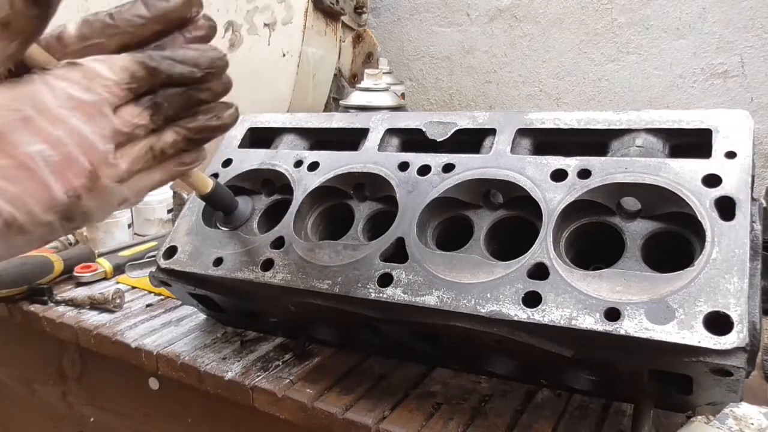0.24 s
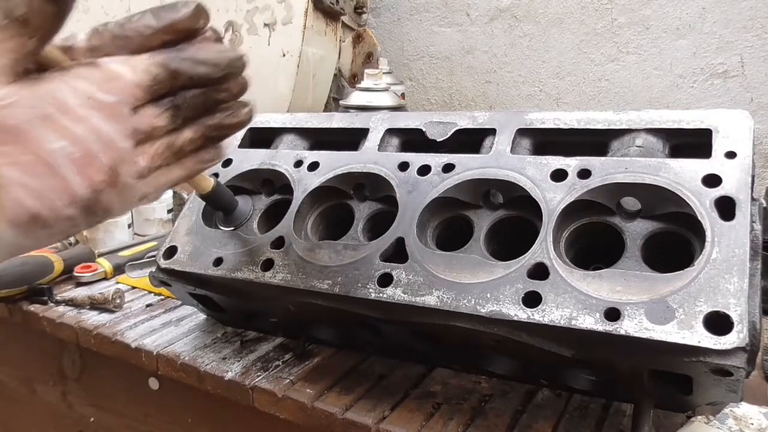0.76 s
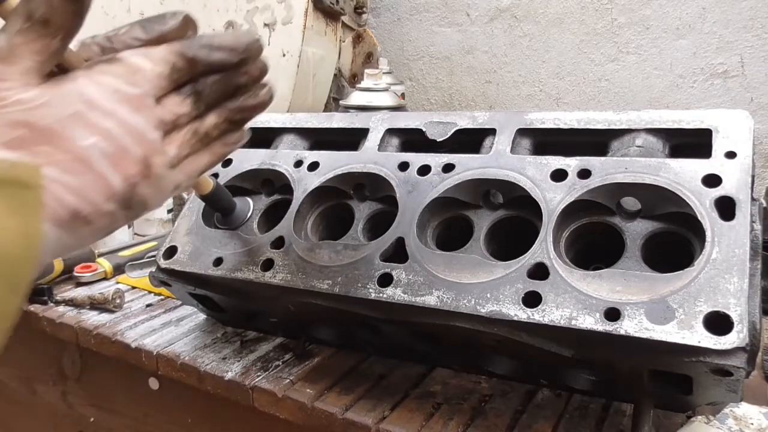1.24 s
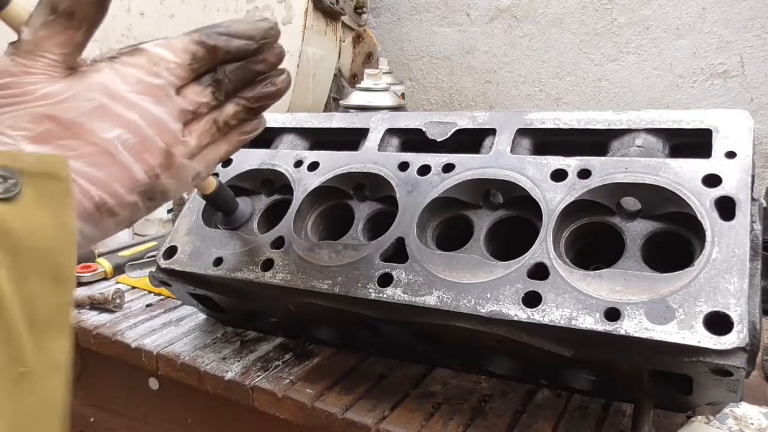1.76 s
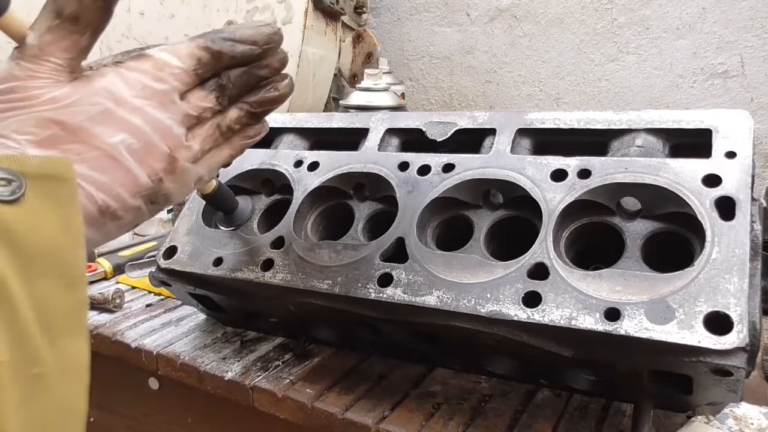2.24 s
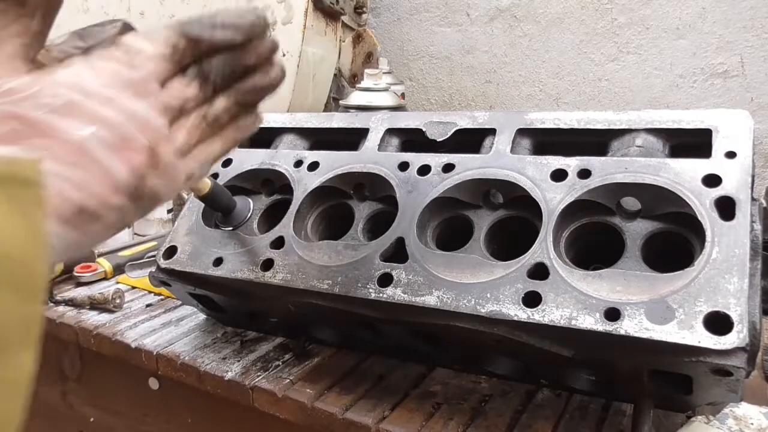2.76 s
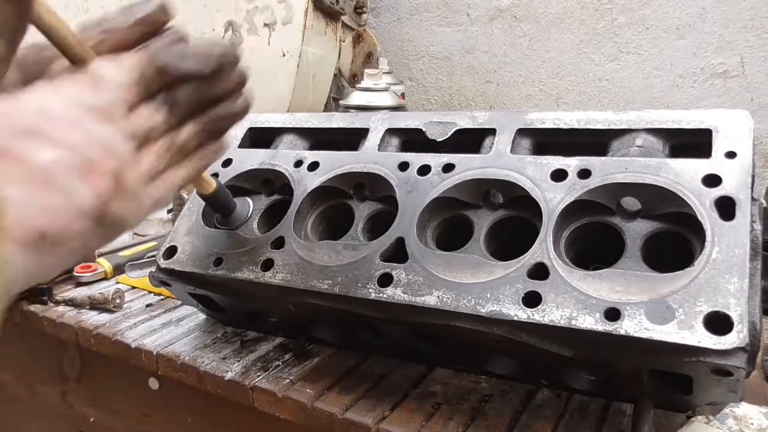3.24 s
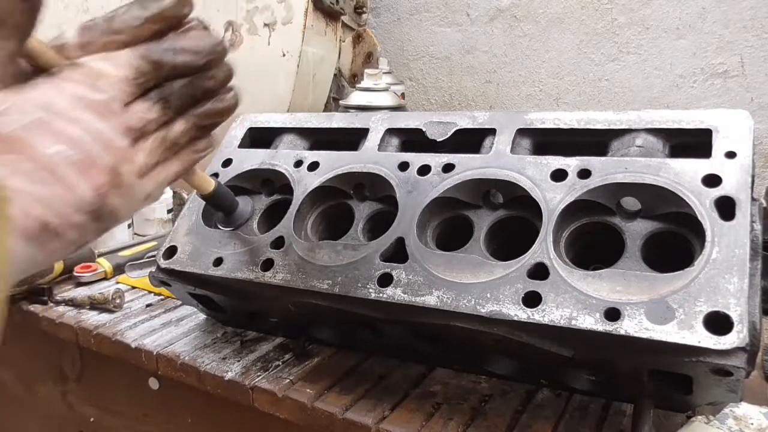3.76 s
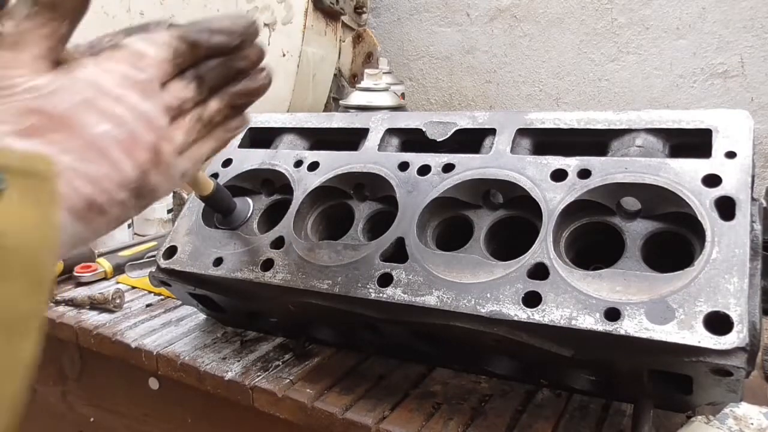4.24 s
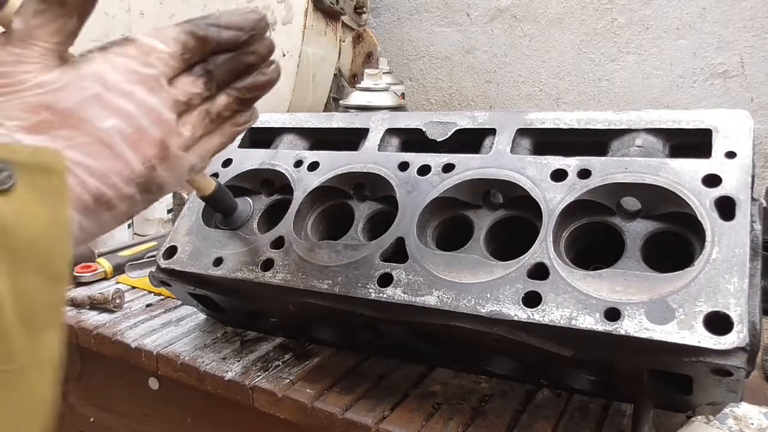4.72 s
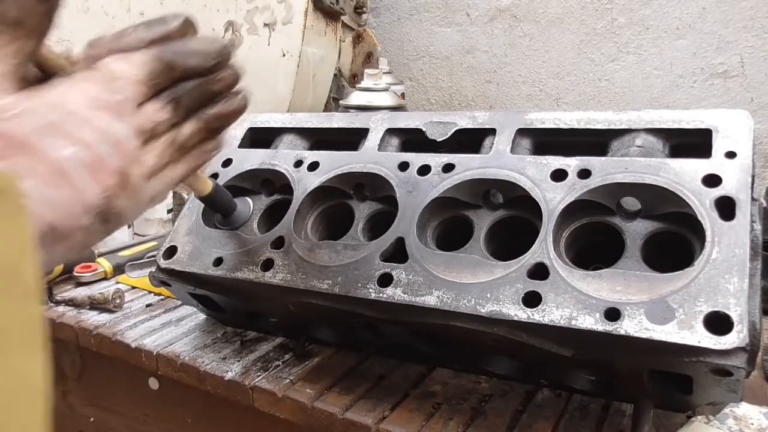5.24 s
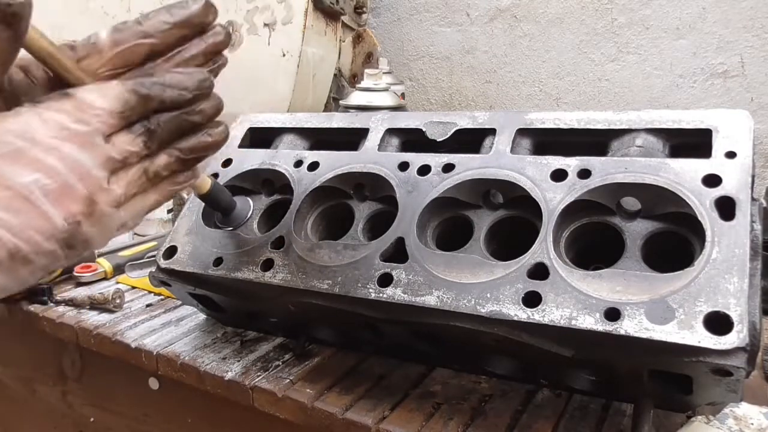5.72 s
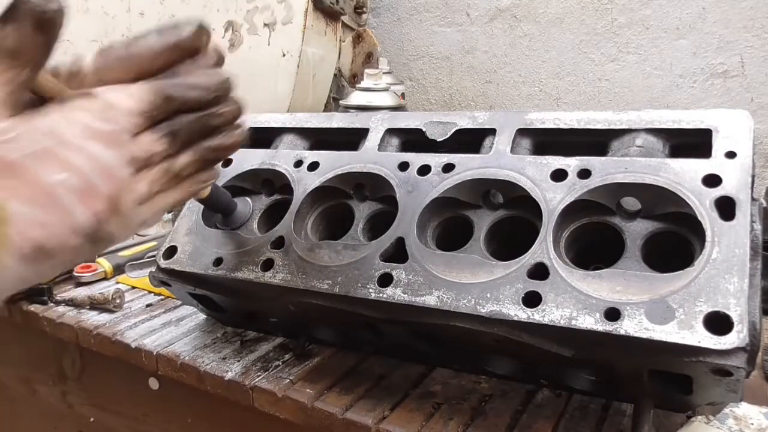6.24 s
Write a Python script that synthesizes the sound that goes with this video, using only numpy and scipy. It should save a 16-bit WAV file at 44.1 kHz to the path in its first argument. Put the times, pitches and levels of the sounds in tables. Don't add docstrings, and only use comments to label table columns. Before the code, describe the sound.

Rapid scrape-scrape of grinding paste in a heavy iron casting, heard close with little room tail. Strokes swell and stop, some chattering with a hollow, honking note. The rhythm breaks twice as hands let go and rustle over the stick, then resumes evenly. Distant engines drift beneath, a lorry strongest around 5.6 seconds, and a final stroke lifts to a higher, breathy note.

```python
import sys
import numpy as np
from scipy import signal
from scipy.fft import rfft, irfft
from scipy.io import wavfile

SR = 44100
rng = np.random.default_rng(int(sys.argv[2]) if len(sys.argv) > 2 else 0)


def gain_from_db(level_db):
    decades = np.asarray(level_db, float) / 20
    return 10 ** decades


def log_audio(samples):
    frames = np.atleast_2d(samples).T
    limited = np.clip(frames, -1, 1)
    pcm = np.round(limited * 32767).astype(np.int16)
    wavfile.write(sys.argv[1], SR, pcm)


N = 285768
TIME = np.arange(N) / SR
HZ = np.maximum(np.fft.rfftfreq(N, 1 / SR), 1)

# (time [s], rumble level [dB])
TRAFFIC_SWELL = [
    (0.0, -56),
    (0.54, -57.5),
    (1.51, -55.5),
    (1.93, -55),
    (3.1, -53),
    (4.13, -52.5),
    (4.48, -53.5),
    (5.31, -52.5),
    (5.56, -48),
    (5.77, -47.5),
    (6.01, -48),
    (6.32, -51),
    (6.48, -51.5),
]
# (nearest time [s], time near [s], pitch [Hz], glide [Hz/s], level [dB])
LORRY = [
    (4.25, 0.39, 47.8, 2.5, -56.5),
    (5.62, 0.14, 51.8, 3.4, -46),
    (5.33, .2, 104.5, 3.9, -44.5),
    (5.22, 0.1, 213, 1.1, -60),
    (5.85, 0.085, 214.2, 3.0, -45),
]
CAR = [
    (2.05, 0.17, 64.2, 11.5, -53),
    (2.65, .2, 72, 10.5, -57),
    (3.3, 0.15, 70.6, -11, -58),
    (3.7, .18, 61.96, -20.0, -57),
]
VAN = [
    (4.78, 0.21, 250.2, -2.5, -53),
]
BUS = [
    (5.2, .12, 126.9, -6, -55),
    (5.9, 0.26, 124, -0.5, -52),
]
IDLER = [
    (.45, .2, 114.5, -3.5, -62.5),
    (.9, 0.11, 107, 3.5, -59),
    (1.45, 0.33, 116.2, 10, -60.5),
]
MOPED = [
    (4.63, 0.2, 180, 0.082, -57.5),
]
# (frequency [Hz], level [dB per Hz])
RUMBLE_COLOUR = [(25, -27), (45, -3), (70, -5), (90, -10.5), (120, -5), (230, 0.5), (350, -6), (600, -8),
                 (800, -11), (1100, -13), (1650, -26), (3000, -45.5)]
AIR_COLOUR = [(1000, 1), (2000, 2), (4000, 2), (6200, -1), (8500, 2.5), (11000, 1), (14000, -6),
              (16000, -11)]

# (start [s], grit level [dB], pointedness of the speed peak [-], port level [dB])
TWISTS = [(-0.115, -48, 1.6, -35.5), (0.086, -48.5, 1.25, -38), (0.29, -48, 1.22, -41),
          (0.504, -48, 1.4, -38), (0.737, -47, 0.75, -38.5), (0.927, -45, 1.34, -38),
          (1.152, -47.5, 0.62, -37.5), (1.352, -45.5, 1.27, -39.5), (1.56, -46, 0.78, -38),
          (1.782, -45, 1.8, -37), (2.024, -45.5, 0.95, -38.5), (2.287, -44.5, 1.07, -38),
          (2.805, -44, 2, -32.5), (3.387, -44, 1.95, -42), (3.705, -45, 1.93, -39.5),
          (3.927, -44, 2.06, -37.5), (4.138, -45, 0.93, -40), (4.346, -45, 1.54, -40),
          (4.565, -43.5, 1.43, -39), (4.778, -43, 1.7, -37.5), (4.979, -44, 1.7, -40.5),
          (5.177, -43.5, 1.87, -36.5), (5.377, -44, 1.64, -36), (5.573, -44, 1.85, -39),
          (5.78, -44.5, 1.46, -39.5), (5.997, -44, 1.6, -40), (6.22, -43.5, 1.33, -38.5),
          (6.413, -40.5, 3, -44.5)]
LET_GO = [
    2.512,
    3.23,
    6.603,
]
# (start [s], end [s], lean [-], grit level [dB], pointedness [-])
COAST = (2.494, 2.568, 1.5, -52.0, 0.88)
REVERSAL_GAP = [.007, 0, -.012]
# (time [s], level [dB])
BEARING = [(0, -0.2), (2.47, 0.35), (2.51, -10), (2.57, -19), (2.6, -32), (2.83, -34), (2.9, -11),
           (2.96, -1.8), (3.13, -4), (3.24, -31), (3.4, -28), (3.47, -12), (3.5, 4.5), (3.6, 1.9),
           (6.22, -0.35), (6.3, -10), (6.41, -22), (6.45, -1)]

# (frequency [Hz], width [Hz], level [dB], left-right [dB])
VALVE_HEAD_MODES = [(6910, 55, -11, 0), (8070, 45, -6, -1.5), (8812, 55, -3, -0.5), (9200, 60, -8, 0),
                    (9471, 50, 0, -2.5), (9720, 50, -8, 0), (9950, 60, -5, 0), (11800, 80, -12, -3.0),
                    (12800, 110, -13, -4.0)]
# (frequency [Hz], width [Hz], level [dB], left-right [dB])
CASTING_MODES = [(1756, 7, 1.5, -12), (1840, 18, 3, 3.5), (1945, 22, -6, -5), (3711, 38, -1, 8),
                 (3935, 28, -5.5, -9), (4970, 18, -9, 2.0)]
# (frequency [Hz], width [Hz], level [dB], left-right [dB])
CLEAR_MODES = [(2308, 16, -11, 1.5), (3546, 28, -9.5, 2.0), (5197, 24, -15.5, 3.0)]
# (forward twist [dB], backward twist [dB])
BITE = [(4.5, -3), (2.5, -2), (2, 0.5)]
# (time [s], extra level [dB])
ODD_BITES = [
    [(0.02, -10), (2.41, 0), (3.55, 5), (3.82, -10), (4.03, -3), (4.68, -3), (5.48, -3.5), (6.1, 7),
     (6.32, -4.5), (6.46, 5)],
    [(0.4, -0.5), (0.62, -27), (1.9, 6), (2.16, -4), (2.41, -0.5), (3.82, -3), (4.24, 1.5), (4.45, 6.5),
     (4.68, 2.5), (4.87, 1), (5.08, -4), (5.48, -4)],
    [(0.02, 0), (0.62, 0), (1.25, -2), (1.9, 3), (3.01, -10), (3.82, -7), (5.28, 0), (5.89, 0)],
]
# (frequency [Hz], width [Hz], level [dB], left-right [dB])
PORT_MODES = [(873.5, 37.5, -9.5, 2), (913, 19.5, -6, -5), (962.6, 40.3, -1, 3), (1000, 31.4, -4.5, 3),
              (1037, 43, -15, -4), (1117, 40, -12, -1), (1152, 48, -14.5, -5.5), (1329, 40, -19, 2),
              (1480, 39, -20.5, 5)]
# (time [s], peak level [dB], pitch [Hz])
CATCHES = [(0.033, -28.5, 926), (0.139, -22, 966), (0.192, -24.5, 966), (0.226, -24.5, 921),
           (0.537, -34, 1006), (0.772, -24.5, 929), (0.977, -27, 963), (1.032, -24, 1007),
           (1.497, -27.5, 1000), (1.576, -26, 1000), (2.039, -27.5, 972), (2.318, -24.5, 967),
           (2.385, -23, 928), (2.463, -23.5, 972), (3.042, -24.5, 947), (3.101, -34, 970),
           (3.499, -19, 970), (3.631, -26, 1028), (3.734, -26.5, 987), (3.814, -23, 920), (4.038, -26, 966),
           (4.146, -22.5, 943), (4.314, -22, 963), (4.641, -26, 963), (4.874, -20.5, 980),
           (5.219, -24, 959), (5.437, -26, 968), (5.612, -21, 951), (5.701, -23, 983), (6.469, -22.5, 932)]
# (time [s], length [s], level [dB])
SLIPS = [
    (1.829, 0.0092, -44),
    (2.789, 0.017, -51),
    (2.828, 0.012, -54),
    (3.297, 0.024, -51),
    (3.334, 0.057, -56.5),
    (3.393, 0.023, -52.5),
]
# (time [s], pitch [Hz], level [dB])
LIFT = [
    (6.27, 1013, -53),
    (6.329, 1080, -46.5),
    (6.41, 1153, -46),
]
# (frequency [Hz], level [dB per Hz])
GRIT_COLOUR = [(4500, -18), (6000, -16), (7500, -8), (8700, -4), (9600, -2), (10600, -6), (12500, -12),
               (13600, -11), (14300, -14), (15000, -31)]
SCRAPE_COLOUR = [(600, -15), (900, 12), (1400, 7), (1650, -3.5), (2600, -3), (2950, 1.5), (3350, -2.5),
                 (3650, -4.5), (4300, -1.5), (5800, -6.5), (7000, -12), (9000, -37)]
SKIN_COLOUR = [(2000, -26), (4000, -7), (7000, -8), (10000, 5.5), (13000, -11), (15000, -22)]

# (frequency [Hz], likeness [0-1])
NEAR_LIKENESS = [(800, 0.54), (1450, 0.87), (1700, 0.85), (2600, 0.91), (3350, 0.99), (3600, 0.81),
                 (4700, 0.86), (5600, 0.69), (7300, 0.29), (9500, 0.55), (12000, 0.62), (14000, 0.16)]
FAR_LIKENESS = [(60, 0.94), (150, 0.98), (380, 0.85), (950, 0.6), (2380, 0.15), (5980, 0.21), (15000, 0.08)]
# (frequency [Hz], left-right [dB])
PORT_BALANCE = [(60, -2.5), (200, -1.2), (600, -2.0), (1000, 0.5), (1700, 0), (7000, 0), (8000, 1.5),
                (10000, -0.5), (12500, -5.5), (15000, -4.0)]
# (frequency [Hz], left leads by [rad])
PORT_LEAD = [(1000, .15), (1450, .4), (1750, 0), (6500, .05), (7500, 1.5), (8300, .4), (9400, -.4),
             (10300, .3), (12000, .4), (13300, 2.5), (14200, 3.1)]

AIR_DB, PASS_FALL_DB = -66.5, 17.5
ROAR_DB, ROAR_FOLLOWS = -54.0, 0.81
LEAN_FORWARD, LEAN_BACK, LEAN_RESTART = 0.84, 0.99, 1.04
CASTING_DB, CASTING_BACK_DB = -51.0, 0.3
CASTING_FOLLOWS_GRIT, CASTING_FOLLOWS_BEARING = 0.65, 0.42
YARD_T60_S, YARD_DB = 0.35, -14


def rms_one(x):
    return x / np.sqrt(np.mean(x ** 2) + 1e-20)


def in_time(rows):
    s, *columns = np.transpose(rows)
    return [np.interp(TIME, s, c) for c in columns]


def at_hz(points):
    hz, value = np.transpose(points)
    return np.interp(np.log(HZ), np.log(hz), value)


def drift(rate):
    r = np.exp(-80 * np.pi * rate / SR)
    noise = rng.standard_normal(N // 40 + 2002)
    slow = signal.lfilter([1], [1, -2 * r, r * r], noise)[2000:]
    return np.interp(np.arange(N) / 40, np.arange(len(slow)), rms_one(slow))


def colour(x, spectrum):
    gain = gain_from_db(at_hz(spectrum))
    return irfft(rfft(x) * gain / np.sqrt(np.mean(gain ** 2)), N)


def two_ports(shared, own, likeness):
    alike = np.clip(at_hz(likeness), 0, 1)
    mid = np.sqrt((1 + alike) / 2) * rfft(shared)
    side = np.sqrt((1 - alike) / 2) * rfft(own)
    offset = gain_from_db(at_hz(PORT_BALANCE) / 2) * np.exp(0.5j * at_hz(PORT_LEAD))
    return irfft(np.array([(mid + side) * offset, (mid - side) / offset]), N)


def engine(s, near_s, hz, glide, db):
    pitch = hz + glide * np.clip(TIME - s, -1, 1)
    unsteady = pitch * (1 + 0.0079 * drift(4.56))
    note = np.sin(2 * np.pi * np.cumsum(unsteady) / SR)
    pass_db = db - PASS_FALL_DB * np.log10(1 + ((TIME - s) / near_s) ** 2)
    return np.sqrt(2) * gain_from_db(pass_db + 1.56 * drift(4.2)) * note


def traffic():
    rumble_db, = in_time(TRAFFIC_SWELL)
    roar_db = ROAR_DB + ROAR_FOLLOWS * (rumble_db - rumble_db.mean())
    noise = two_ports(*rng.standard_normal((2, N)), FAR_LIKENESS)
    noise = rms_one(colour(noise, RUMBLE_COLOUR))
    low = signal.sosfiltfilt(signal.butter(2, 340, fs=SR, output="sos"), noise)
    rumble = gain_from_db(rumble_db + 3.5) * low + gain_from_db(roar_db + 7.0) * (noise - low)
    notes = sum(engine(*note) for note in LORRY + CAR + VAN + BUS + IDLER + MOPED)
    air = colour(two_ports(*rng.standard_normal((2, N)), FAR_LIKENESS), AIR_COLOUR)
    return rumble + notes * gain_from_db([[-1.2], [1.2]]) + gain_from_db(AIR_DB) * air


def twists():
    turn = np.transpose(TWISTS)[0]
    grip = np.searchsorted(LET_GO, turn)
    half_gap = np.array(REVERSAL_GAP)[grip] / 2
    end = np.minimum(np.append(turn[1:], np.inf) - half_gap, np.array(LET_GO)[grip])
    forward = np.arange(len(turn)) % 2 == 0
    return turn + half_gap, end, forward


def per_twist(values):
    return np.asarray(values)[np.searchsorted(twists()[0], TIME) - 1]


def spin(sharpness, lag_s, with_level):
    coarse = TIME[::32]
    start, end, forward = twists()
    lean = np.where(forward, LEAN_FORWARD, LEAN_BACK)
    lean[np.searchsorted(start, LET_GO[:-1])] = LEAN_RESTART
    rows = np.c_[start, end, lean, np.array(TWISTS)[:, 1:3]]
    start, end, lean, db, pointed = np.vstack([rows, COAST]).T[:, :, None]
    part = np.clip((coarse - lag_s - start) / (end - start), 0, 1)
    speed = np.abs(np.sin(np.pi * part ** lean)) ** (pointed * sharpness)
    each = gain_from_db(db * with_level) * speed * (part < 1)
    return np.interp(TIME, coarse, np.sqrt(np.sum(each ** 2, axis=0)))


def grains(per_s, spread_db):
    sizes = gain_from_db(spread_db * np.minimum(rng.exponential(1, N), 5)) * rng.choice([-1, 1], N)
    return rms_one(sizes * (rng.random(N) < per_s / SR))


def resonate(x, modes, wander_db, wander_rate):
    out, power = np.zeros((2, N)), 0
    for k, (hz, width, db, pan_db) in enumerate(modes):
        r = np.exp(-np.pi * width / SR)
        drive = x * gain_from_db(db + wander_db * drift(wander_rate)) * (-1) ** k
        zeros = [(1 - r * r) / 2, 0, (r * r - 1) / 2]
        poles = [1, -2 * r * np.cos(2 * np.pi * hz / SR), r * r]
        ring = signal.lfilter(zeros, poles, drive + 1e-18)
        out += ring * gain_from_db([[pan_db / 2], [-pan_db / 2]])
        power += gain_from_db(2 * db) * np.pi * width / SR
    return out / np.sqrt(power)


def seat_grit():
    level = spin(0.94, 0, with_level=0.99) * gain_from_db(1.26 * drift(18))
    shared, own = (level * grains(14000, 3.44) for _ in range(2))
    hiss = colour(two_ports(shared, own, NEAR_LIKENESS), GRIT_COLOUR)
    head = resonate(own, VALVE_HEAD_MODES, wander_db=3.5, wander_rate=3.4)
    return gain_from_db(-0.5) * hiss + gain_from_db(-5.5) * head


def bite_into(both_ways, odd):
    start, _, forward = twists()
    db = np.where(forward, *both_ways)
    s, extra_db = np.transpose(odd)
    db[np.searchsorted(start, s) - 1] += extra_db
    return per_twist(db)


def casting(casting_db):
    clumps = gain_from_db(casting_db + 1.83 * drift(17.0))
    shared, own = (clumps * grains(6000, 3.03) for _ in range(2))
    speed = spin(0.73, 0.0012, with_level=0)
    scrape = colour(two_ports(speed * shared, speed * own, NEAR_LIKENESS), SCRAPE_COLOUR)
    drive = spin(0.56, 0.0085, with_level=0) * own
    rings = gain_from_db(-6.0) * resonate(drive, CASTING_MODES, wander_db=2.0, wander_rate=4.6)
    for (hz, width, db, pan_db), bite, odd in zip(CLEAR_MODES, BITE, ODD_BITES):
        bitten = drive * gain_from_db(bite_into(bite, odd))
        rings += gain_from_db(db) * resonate(bitten, [(hz, width, 0, pan_db)], wander_db=2.5, wander_rate=14.5)
    return gain_from_db(2.0) * scrape + rings


def port(port_db):
    level = spin(0.31, 0.0016, with_level=0) * gain_from_db(port_db + 1 + 1.5 * drift(33))
    grind = resonate(level * grains(8000, 3.24), PORT_MODES, wander_db=1.0, wander_rate=3.5)
    grind = signal.sosfilt(signal.butter(3, [790, 1700], "band", fs=SR, output="sos"), grind)
    chatter, after = np.zeros(N + SR), TIME[:SR // 10]
    swell = after / 0.0083 * np.exp(1 - after / 0.0073)
    for (s, db, hz), phase in zip(CATCHES, rng.random(len(CATCHES))):
        at = round(s * SR)
        note = np.sin(2 * np.pi * (hz * after + phase))
        chatter[at:at + SR // 10] += gain_from_db(db - 6.5) * swell * note
    return grind + chatter[:N] * gain_from_db([[0.9], [-0.9]])


def fingers():
    coarse = TIME[::32]
    level = np.zeros(len(coarse))
    for s, length, db in SLIPS:
        fall = np.exp(-np.clip((coarse - s) / length, 0, 9) ** 3)
        level += gain_from_db(db) * (coarse > s) * fall
    shared, own = (np.interp(TIME, coarse, level) * grains(9000, 3.3) for _ in range(2))
    return colour(two_ports(shared, own, NEAR_LIKENESS), SKIN_COLOUR)


def lifted_port():
    hz, db = in_time(LIFT)
    fade = np.clip(np.minimum(TIME - LIFT[0][0], LIFT[-1][0] - TIME) / 0.018, 0, 1)
    return gain_from_db(db) * fade * drift(60) * np.sin(2 * np.pi * np.cumsum(hz) / SR)


def yard(x):
    after = TIME[:SR // 2]
    tail = rng.standard_normal((2, SR // 2)) * gain_from_db(-60 * after / YARD_T60_S) * (after > 0.003)
    tail /= np.sqrt(np.sum(tail ** 2, axis=1, keepdims=True))
    return gain_from_db(YARD_DB) * signal.fftconvolve(x, tail, axes=1)[:, :N]


def scene():
    bearing_db, = in_time(BEARING)
    _, grit_db, _, port_db = np.transpose(TWISTS)
    backward = ~twists()[2]
    scrape_db = CASTING_FOLLOWS_GRIT * (grit_db - grit_db.mean()) + CASTING_BACK_DB * backward
    casting_db = CASTING_DB + per_twist(scrape_db) + CASTING_FOLLOWS_BEARING * bearing_db
    port_db = per_twist(port_db) + bearing_db
    grinding = seat_grit() + casting(casting_db) + port(port_db) + lifted_port()
    grinding = signal.sosfilt(signal.butter(6, 14500, fs=SR, output="sos"), grinding)
    bench = grinding + fingers()
    return traffic() + bench + yard(bench)


def band_limit(x):
    return signal.sosfilt(signal.butter(12, 15710, fs=SR, output="sos"), x)


def record(dry):
    return band_limit(dry)


dry = scene()
out = record(dry)
log_audio(out)
```